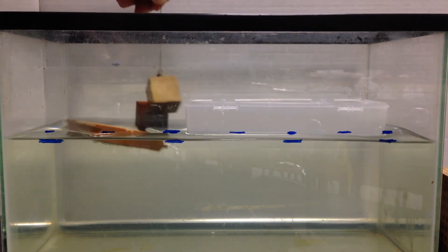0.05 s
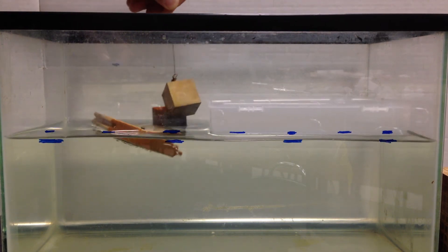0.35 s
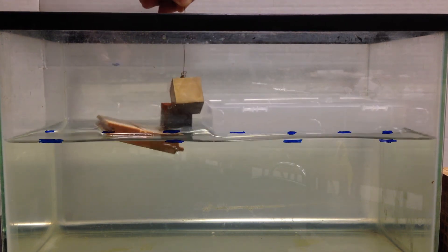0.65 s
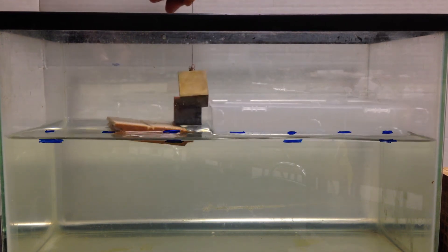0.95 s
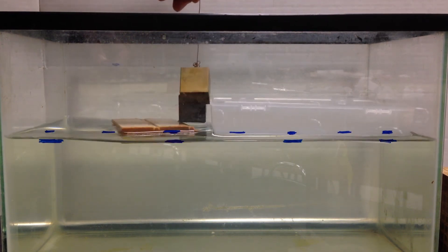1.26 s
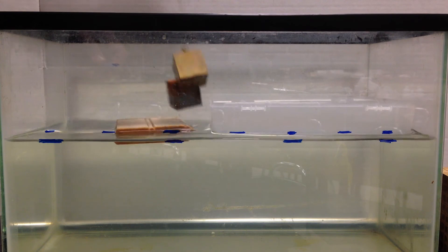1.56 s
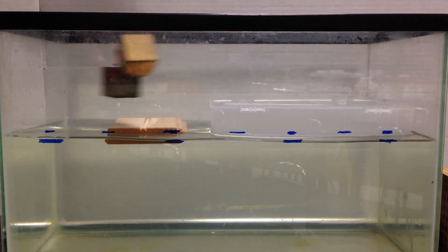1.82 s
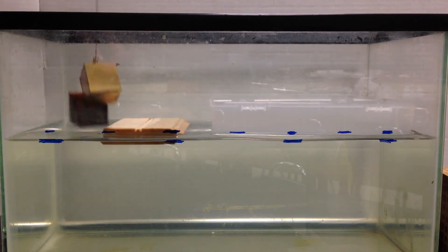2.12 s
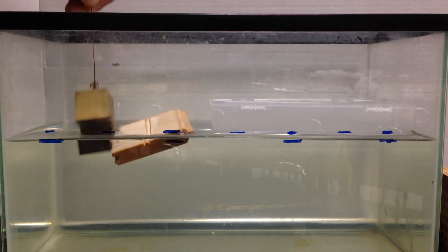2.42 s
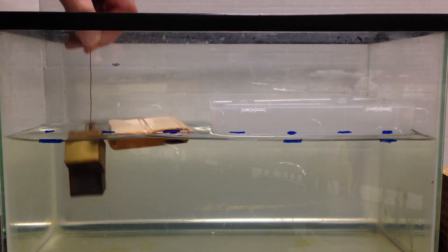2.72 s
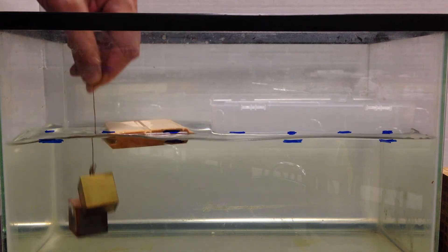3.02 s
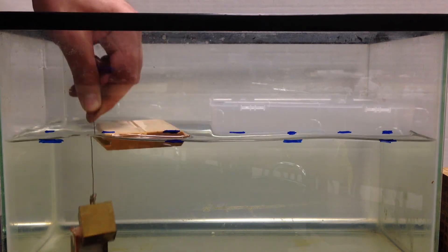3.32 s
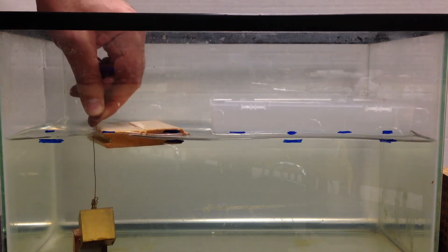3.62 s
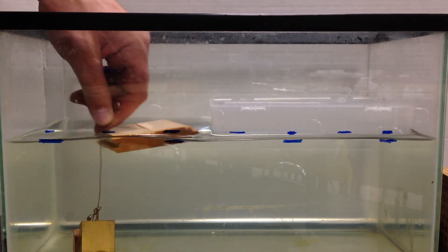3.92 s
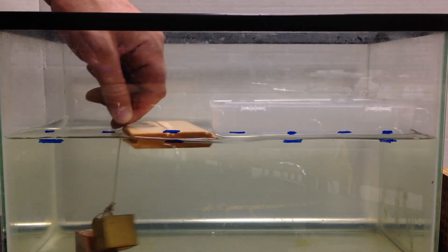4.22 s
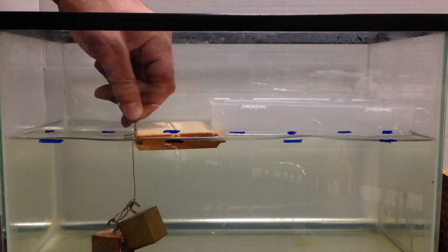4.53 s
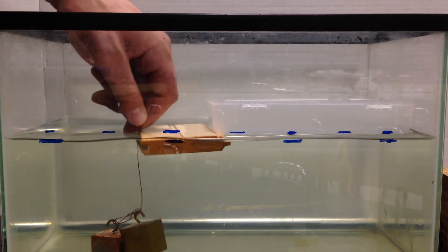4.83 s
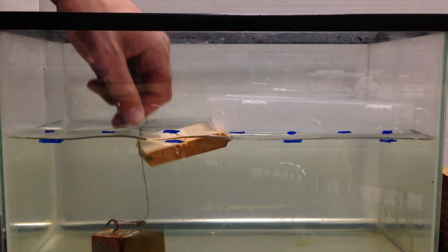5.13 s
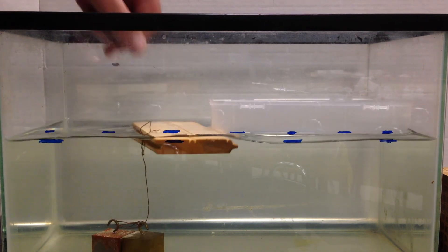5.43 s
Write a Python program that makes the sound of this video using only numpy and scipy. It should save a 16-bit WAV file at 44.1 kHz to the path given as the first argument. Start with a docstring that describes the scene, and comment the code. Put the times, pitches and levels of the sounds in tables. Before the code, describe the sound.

A quiet room with faint ventilation and electrical hum lies under small, close sounds. From 0.2 to 1.5 seconds, two dangling metal cubes click lightly together and nudge a floating wooden boat, making hollow taps, strongest at 0.4 and 0.8 seconds, with a faint chatter after. A soft dull bump comes at 2.2 seconds and a tiny drop plinks at 2.7.

At 3.4 seconds the cubes knock sharply on the water-filled glass tank, which rings briefly. Softer, duller knocks follow between 4.1 and 5 seconds, mixed with faint scraping along the bottom, tiny bright wire ticks and a slight hiss of wet string. At 5.2 seconds the weight topples onto the glass with by far the loudest knock and a low boom that swells and dies quickly. A faint drag, two ticks and a soft string hiss finish by about 5.7 seconds.

```python
"""An anchor of two metal cubes knocks on a glass water tank from inside, ringing its walls, and at last
topples onto the bottom with a low boom. Before that, dangling on their string, the cubes click together
and nudge a small wooden boat, whose hull answers with hollow taps. As they are lowered, a drop plinks,
the wire hook ticks, the wet string hisses and the anchor drags. Behind lies a quiet room with mains hum."""
import sys
import numpy as np
from scipy import signal
from scipy.fft import rfft, irfft, next_fast_len
from scipy.io import wavfile

SR = 44100
rng = np.random.default_rng(int(sys.argv[2]) if len(sys.argv) > 2 else 0)


def store_wav(level_fs):
    """Save 16-bit WAV to argv[1]."""
    pcm = np.round(np.clip(np.atleast_2d(level_fs), -1, 1) * 32767)
    wavfile.write(sys.argv[1], SR, pcm.T.astype(np.int16))


N = 249638
T = np.arange(SR // 2) / SR  # the life of one contact, s
FIRM_DB = -35.5  # a firm knock; tone and ring are set relative to it

# Modes of the water-filled tank. Each row: pitch in Hz, relative level in dB, undamped t60 in seconds.
TANK_MODES = [(162.66, -18.5, 0.2022), (213.5, -18.5, 0.32), (287.5, -12, 0.33), (377.8, -14, 0.23),
              (453.18, -21.5, 0.31), (516.2, -11.5, 0.22), (570.01, -22.5, 0.27), (610.3, -14.5, 0.27),
              (663, -18.5, 0.15), (830, -23.5, 0.3), (944.6, -4.5, 0.17854), (992.32, 0.5, 0.13),
              (1080, -22.5, 0.25), (1270, -13, 0.2), (1320, -13, 0.2316), (1470, -10, 0.13),
              (1680, -12, 0.1697), (1807, -5.5, 0.079), (2078, -9.5, 0.11), (2328, -8, 0.085),
              (2776, -5.5, 0.063), (2963, -13.5, 0.088), (3870, -26, 0.025)]


def amp(db):
    """Decibels to gain."""
    return 10 ** (np.asarray(db) / 20)


def unit(x):
    """x at rms 1."""
    return x / np.sqrt(np.mean(x ** 2) + 1e-20)


def at_level(x, db):
    """Scale a contact so that its first 20 ms have the given rms."""
    return amp(db) * x / np.sqrt(np.mean(x[:SR // 50] ** 2))


def add(track, start, x):
    """Mix x into the track from start seconds on."""
    part = track[round(start * SR):][:len(x)]
    part += x[:len(part)]


def lowpass(x, hz, order):
    """Roll off the treble."""
    return signal.sosfilt(signal.butter(order, min(hz, SR * .45), fs=SR, output="sos"), x)


def highpass(x, hz, order):
    """Roll off the bass."""
    return signal.sosfilt(signal.butter(order, hz, "high", fs=SR, output="sos"), x)


def noise(colour, size):
    """Noise of rms 1, coloured by (Hz, dB) points."""
    hz, db = np.transpose(colour)
    m = next_fast_len(size)
    gain = amp(np.interp(np.log(np.fft.rfftfreq(m, 1 / SR) + 1), np.log(hz), db))
    return unit(irfft(rfft(rng.standard_normal(m)) * gain, m)[:size])


def ring(modes, lag_cycles, rise_cycles, scatter_db):
    """Damped modes; slow low bending waves arrive and build up later than high ones."""
    hz, db, t60 = np.transpose(modes)[:, :, None]
    age = np.maximum(T - lag_cycles / hz, 0)
    decay = amp(db + scatter_db * rng.standard_normal(hz.shape) - 60 * age / t60)
    attack = 1 - np.exp(-age * hz / rise_cycles)
    return np.sum(decay * attack * np.sin(2 * np.pi * hz * age), axis=0)


def wash(colour, rise_s, t60, room_db, room_t60, room_hz):
    """Countless short modes heard as a burst of noise, then the room's duller tail."""
    burst = noise(colour, len(T)) * (1 - np.exp(-T / rise_s)) * amp(-60 * T / t60)
    tail = lowpass(noise(colour, len(T)), room_hz, order=2)
    build_up = 1 - np.exp(-T / .01)
    return burst + tail * build_up * amp(room_db - 60 * T / room_t60)


def swells(strokes):
    """An envelope with one rounded swell for each stroke."""
    envelope = np.zeros(N)
    for start, length, db in strokes:
        add(envelope, start, amp(db) * np.sqrt(np.abs(np.hanning(int(length * SR)))))
    return envelope


def room_tone():
    """Ventilation rumble, hiss and a mains hum."""
    # Colour of the room's air. Each row: frequency in Hz, relative level in dB.
    air_colour = [(12, -76), (20, -33.5), (92, -12.5), (103, -19), (121, -6), (143, -6.5), (178, -2),
                  (270, -10), (302, -10), (457, -14), (693, -19), (865, -23), (1830, -26.5), (1990, -24),
                  (15000, -28)]
    hum = amp(-69) * np.sin(2 * np.pi * 120 * np.arange(N) / SR)
    return amp(-63.4) * noise(air_colour, N) + hum


def string_slides():
    """The wet string hisses softly as it slides through the fingers."""
    # Slides of the string. Each row: start in seconds, length in seconds, level in dB.
    slides = [(4.27, 0.2603, -69.5), (5.41, .28, -64)]
    # Colour of the friction. Each row: frequency in Hz, relative level in dB.
    hiss_colour = [(500, -6.5), (2000, -2), (3000, 2.5), (4500, 1), (6500, -7.5), (12000, -21)]
    return swells(slides) * noise(hiss_colour, N)


def anchor_drags():
    """Dragged over the bottom, the anchor feeds dense slips into the tank's modes and damps them."""
    # Drags on the glass. Each row: start in seconds, length in seconds, level in dB.
    drags = [(3.6, 0.28, -75.5), (4.17, 0.19, -66.5), (4.35, 0.13774, -60), (4.76, 0.21694, -64.5),
             (5.33, 0.19, -65)]
    damped_modes = np.array(TANK_MODES) * [1, 1, .4]
    slip = ring(damped_modes, lag_cycles=1, rise_cycles=1, scatter_db=1)
    scrape = signal.fftconvolve(rng.standard_normal(N), slip)[:N]
    return swells(drags) * unit(lowpass(scrape, 1120, order=4))


def drop_plink(start=2.731, db=-59.5, hz=1825, t60=.07):
    """A drop falls from the string and traps a small bubble, which rings briefly."""
    out = np.zeros(N)
    add(out, start, ring([(hz, db, t60)], lag_cycles=0, rise_cycles=1, scatter_db=0))
    return out


def hook_ticks():
    """The wire hook and stray drops make tiny bright ticks, each around its own pitch."""
    # The ticks. Each row: start in seconds, level in dB, centre in Hz.
    ticks = [(3.468, -54, 5919), (4.143, -57, 5060), (4.402, -55, 2550), (4.475, -60.5, 3520),
             (5.378, -55, 3635), (5.398, -52, 3911)]
    out = np.zeros(N)
    for start, db, hz in ticks:
        colour = [(hz / 4, -22), (hz, 0), (hz * 2, -24)]
        tick = wash(colour, rise_s=.0006, t60=.045, room_db=-17, room_t60=.2, room_hz=7000)
        add(out, start, amp(db) * tick)
    return out


def cube_clicks():
    """The cubes strike and damp each other at once, so their clicks are short."""
    # Cube on cube. Each row: start in seconds, level in dB.
    clicks = [(.2050, -56), (0.6853, -52.5), (0.805, -51.5), (0.836, -51.5), (1.505, -69), (5.132, -68),
              (5.436, -68)]
    # Modes of the cubes. Each row: pitch in Hz, relative level in dB, t60 in seconds.
    cube_modes = [(1590, -8, .05), (1835, -4, .06), (2110, 0, .06), (2395, -1, .055), (2660, -11, .05)]
    # Colour of a click's burst. Each row: frequency in Hz, relative level in dB.
    metal_colour = [(200, -14.5), (1000, -4), (2300, -4), (3500, -5), (7000, -14), (15000, -34)]
    out = np.zeros(N)
    for start, db in clicks:
        body = ring(cube_modes, lag_cycles=2, rise_cycles=3, scatter_db=2)
        burst = wash(metal_colour, rise_s=.004, t60=.035, room_db=-17, room_t60=.2, room_hz=5000)
        add(out, start, at_level(lowpass(body + amp(4) * burst, 3500, order=2), db))
    return out


def chatter(tap, count=2, after_s=.025, gap_s=.012, loss_db=7):
    """Quick, duller, fading bounces after a tap, as more tap rows."""
    start, db, cutoff_hz = tap
    return [(start + after_s + k * gap_s, db - (k + 1) * loss_db, cutoff_hz / 2) for k in range(count)]


def jostle(count=5, start=.9, gap_s=.052, db=-67, cutoff_hz=2216):
    """The rocking hull keeps brushing the anchor: faint, loosely spaced tap rows."""
    chance = rng.uniform(-.84, 1, (count, 2))
    return [(start + (k + late / 2) * gap_s, db + 2 * loud, cutoff_hz)
            for k, (late, loud) in enumerate(chance)]


def hull_taps():
    """Each nudge on the floating hull sounds a hollow note and a low thump in the water."""
    # Anchor on wood. Each row: start in seconds, level in dB, contact cut-off in Hz.
    taps = [(.4250, -46.5, 6400), (0.5316, -56.5, 3950), (0.7693, -49.5, 1840), (0.8243, -44.5, 5260),
            (1.073, -63, 1200), (1.137, -57, 5000), (4.539, -58, 1250)]
    # Modes heard in a tap: a low hollow thump and the tank's ring near 1 kHz.
    # Each row: pitch in Hz, relative level in dB, t60 in seconds.
    tap_modes = [(208, -11.5, 0.25), (278.91, -5.5, 0.1978), (977.34, -7, 0.1593), (1022, 0.5, 0.08885),
                 (1473.8, -11, 0.11), (1785.4, -11, 0.07876), (2710, -11.5, 0.074), (3050, -12, 0.05),
                 (3897.8, -19, 0.098)]
    # Colour of a tap's burst. Each row: frequency in Hz, relative level in dB.
    wood_colour = [(150, 2), (700, -6.5), (1100, -5.5), (2300, -1), (3200, -2.5), (5000, -8.5), (9000, -19),
                   (15000, -5)]
    hardest = max(taps, key=lambda tap: tap[1])
    out = np.zeros(N)
    for start, db, cutoff_hz in taps + chatter(hardest) + jostle():
        detune = 1 + .02 * rng.standard_normal()  # the pitch varies from tap to tap
        body = ring(np.array(tap_modes) * [detune, 1, 1], lag_cycles=2.3, rise_cycles=.9, scatter_db=1.3)
        burst = wash(wood_colour, rise_s=.002189, t60=.045, room_db=-17.5, room_t60=.26, room_hz=5000)
        add(out, start, at_level(lowpass(body + amp(1.5) * burst, cutoff_hz, order=2), db))
    return out


def wall_boom(start=5.2045, swell_s=.057, hz=297, peak_db=-39):
    """The toppling anchor sets the water-loaded wall booming: a low note that swells and dies quickly."""
    envelope = (T / swell_s * np.exp(1 - T / swell_s)) ** 7
    out = np.zeros(N)
    add(out, start, amp(peak_db) * envelope * np.sin(2 * np.pi * hz * T))
    return out


def glass_blow(db, cutoff_hz):
    """One blow of metal on glass; its force sets how long and how high the tank rings."""
    # Colour of a blow's burst. Each row: frequency in Hz, relative level in dB.
    glass_colour = [(100, -16), (230, -11), (370, -3), (650, -3.5), (820, -6), (1300, -2.5), (2200, -4.5),
                    (3200, -8), (4300, -7.5), (6500, -21), (9000, -35.5), (15000, -53)]
    hz, mode_db, t60 = np.transpose(TANK_MODES)
    sustain = np.clip(.81 + .22 * (db - FIRM_DB), .3, 1)  # soft blows stay in touch and damp the glass
    tilt_db_per_octave = -2 + .29 * (db - FIRM_DB)  # hard blows favour the high modes
    tilted_db = mode_db + tilt_db_per_octave * np.log2(hz / np.median(hz))
    modes = np.column_stack([hz, tilted_db, t60 * sustain])
    body = ring(modes, lag_cycles=1.4, rise_cycles=2, scatter_db=1)
    burst = wash(glass_colour, rise_s=.0028, t60=.04,
                 room_db=-18.5, room_t60=.22423 * sustain, room_hz=4300)
    crack = amp(-14.5 - 60 * T / .016) * rng.standard_normal(len(T))
    return at_level(lowpass(body + amp(8) * burst + crack, cutoff_hz, order=6), db)


def glass_knocks():
    """The anchor bumps the glass and falls back once; the water dulls slow bumps and rebounds."""
    # Anchor on glass. Each row: start in seconds, level in dB.
    knocks = [(2.239, -59), (3.4357, -35.5), (3.4420, -37), (3.748, -61.5), (4.1470, -43), (4.176, -48.5),
              (4.376, -52), (4.403, -53.5), (4.6618, -44), (5.031, -57), (5.2041, -21.5)]
    cushioned_hz, bare_metal_hz = 706, 9900  # cut-offs of the softest and hardest contact
    out = np.zeros(N)
    for start, db in knocks:
        force = amp(db - FIRM_DB)
        cutoff_hz = min(cushioned_hz + 2552.7 * force ** 2.495, bare_metal_hz)
        add(out, start, glass_blow(db, cutoff_hz))
        rebound_db = min(db - 13.5, -47.5)  # the water's drag limits how hard it falls back
        add(out, start + .061, glass_blow(rebound_db, cutoff_hz=566))
    return out


def scene():
    """The mono mix, with the deep bass rolled off the knocks, boom, taps and clicks."""
    hits = highpass(glass_knocks() + wall_boom() + hull_taps() + cube_clicks(), 148, order=3)
    return (hits + hook_ticks() + drop_plink() + anchor_drags() + string_slides() + room_tone())[None]


def record(dry):
    """A steep cut takes off the very top of the treble."""
    top_hz = 15320
    m = next_fast_len(N + SR // 2)
    return irfft(rfft(dry, m) * (np.fft.rfftfreq(m, 1 / SR) < top_hz), m)[..., :N]


dry = scene()
out = record(dry)
store_wav(out)
```